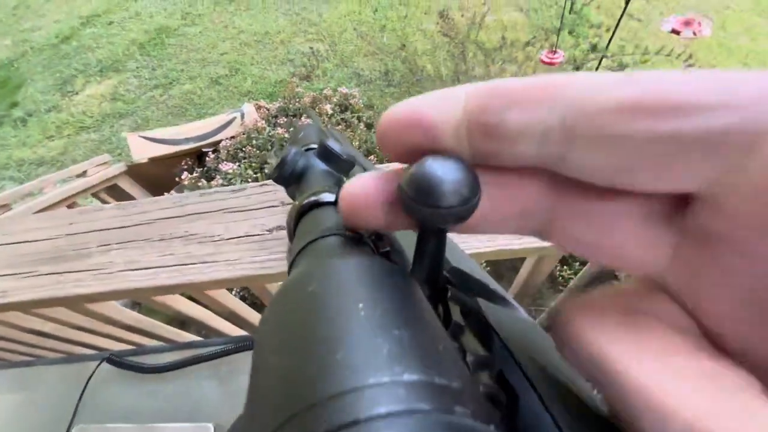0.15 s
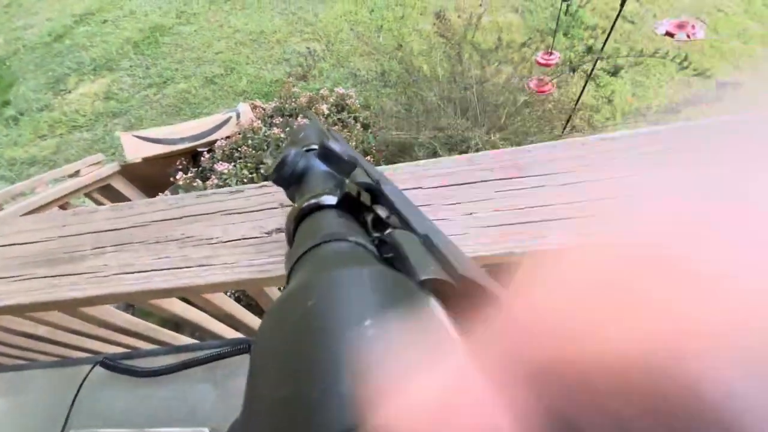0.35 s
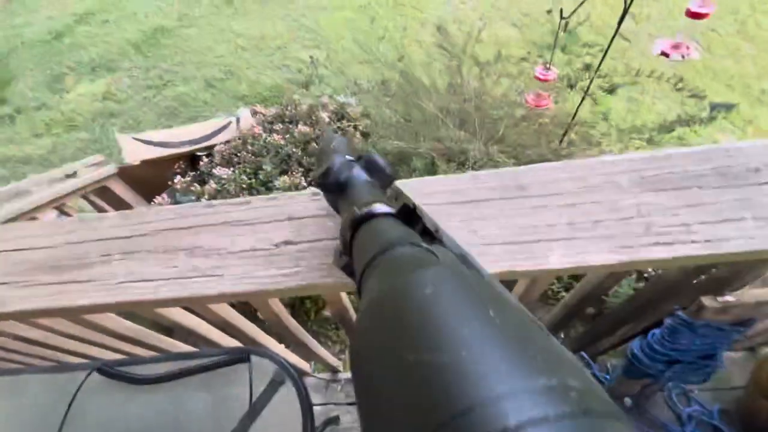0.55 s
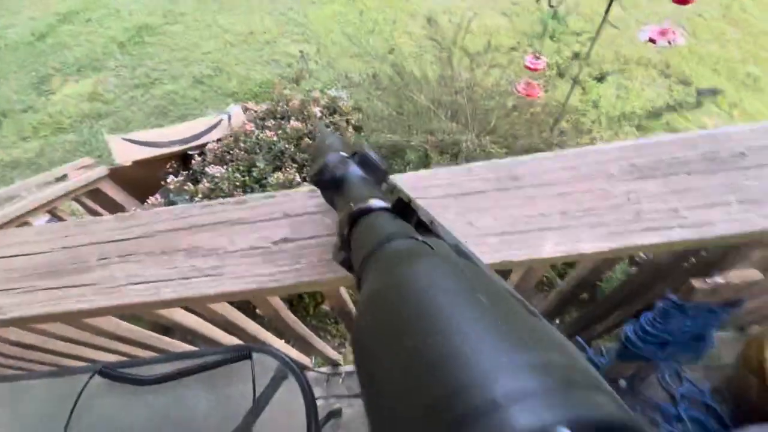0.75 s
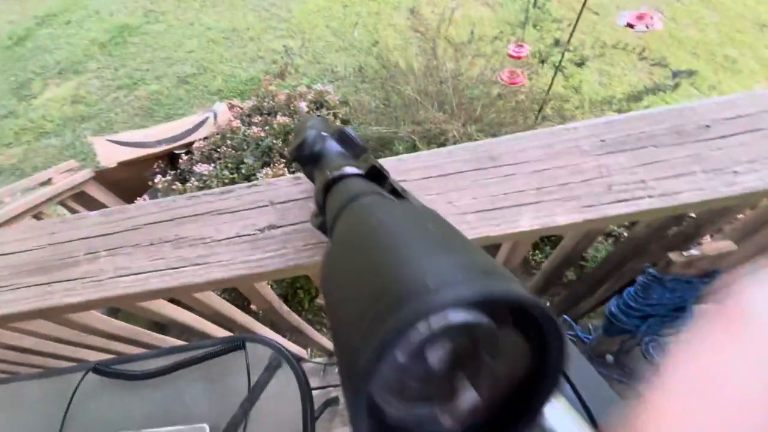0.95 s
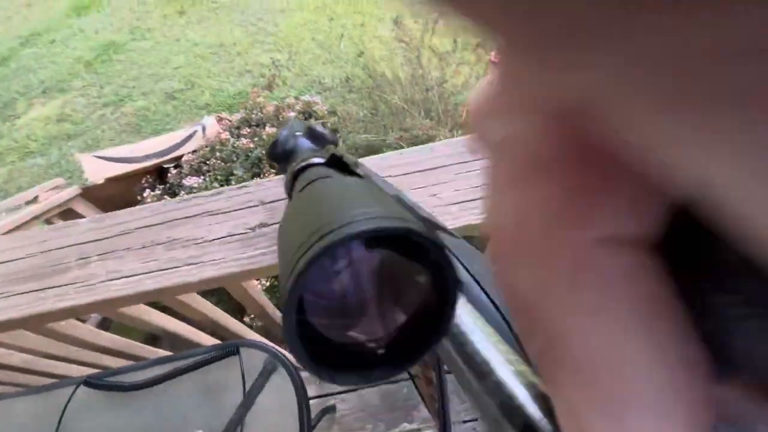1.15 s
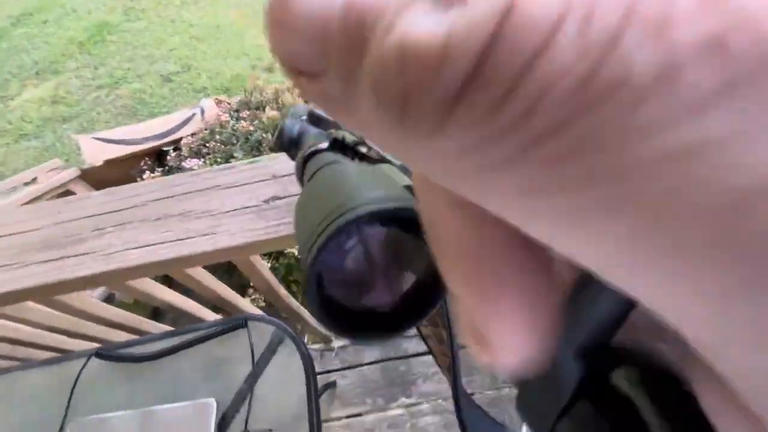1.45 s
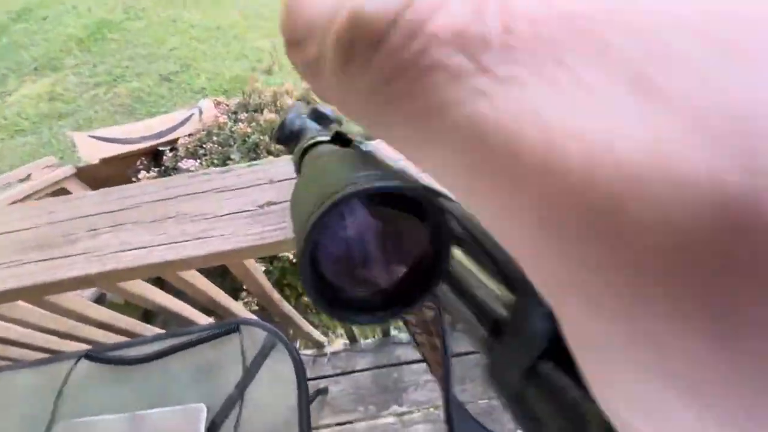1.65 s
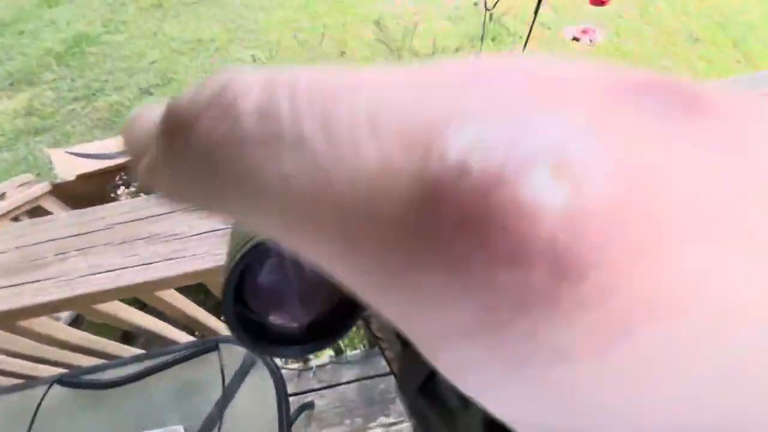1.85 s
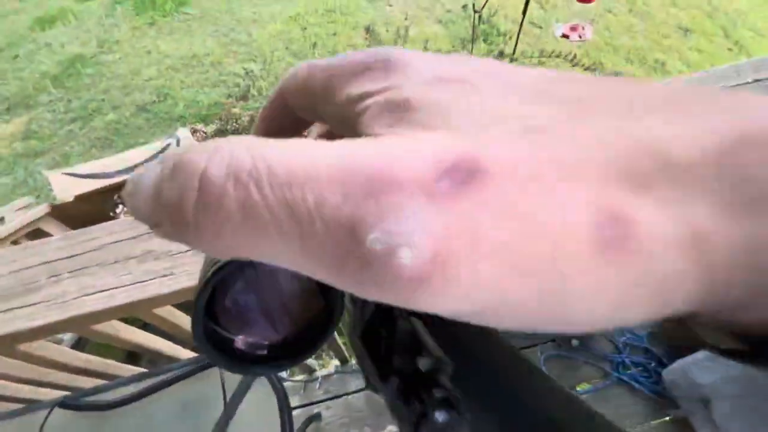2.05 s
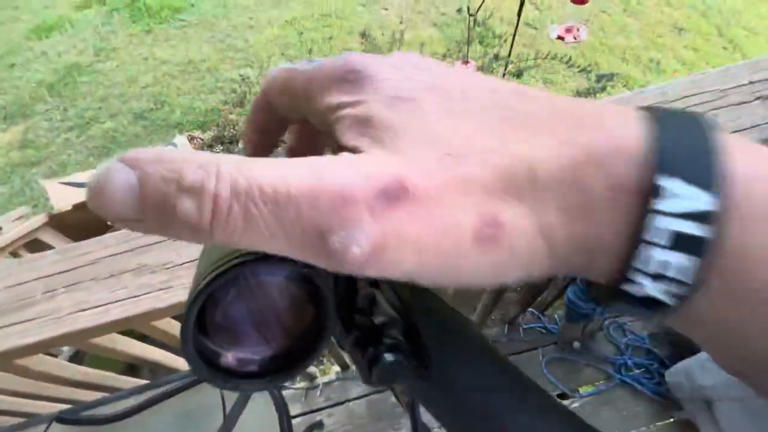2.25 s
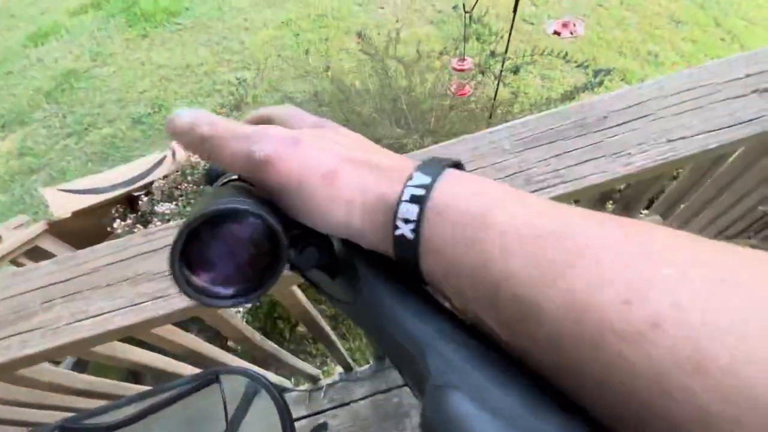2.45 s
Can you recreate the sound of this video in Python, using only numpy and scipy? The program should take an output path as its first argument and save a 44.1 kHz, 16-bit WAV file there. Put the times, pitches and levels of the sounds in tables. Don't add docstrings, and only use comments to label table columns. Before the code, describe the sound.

A rifle bolt is worked very close to the microphone on an outdoor porch: a quick run of clicks, a heavy hollow thud, faint hand fumbling, then a short scrape and a bright metal lock over a soft hum.

```python
import sys
import numpy as np
from scipy import signal
from scipy.fft import rfft, irfft
from scipy.io import wavfile
from scipy.ndimage import uniform_filter1d

SR = 44100
rng = np.random.default_rng(int(sys.argv[2]) if len(sys.argv) > 2 else 0)


def volts(x):
    e = np.asarray(x, float) / 20
    return 10 ** e


def to_wav(s):
    ch = np.atleast_2d(s).T
    pcm = np.round(np.clip(ch, -1, 1) * 32767)
    wavfile.write(sys.argv[1], SR, pcm.astype(np.int16))


N = 114660

# time_s, level_db
GARDEN_LEVEL = [(0,-56),(.12,-53),(.4,-47.5),(.5,-60),(.62,-49),(.9,-48.5),(1.1,-49),(1.2,-52.5),(1.65,-58.5),(1.8,-50.5),(2.2,-47),
                (2.34,-49),(2.44,-62),(2.52,-50),(2.6,-50.5)]
# frequency_hz, density_db (per Hz)
GARDEN_SPECTRUM = [(25,-32),(48,-9.5),(330,-8.5),(660,-25),(979,-15.5),(4730,-34.5),(12000,-47.5),(12900,-67.5)]
# frequency_hz, level_db
GARDEN_WIDTH = [(60,-7.5),(200,-3.5),(700,10.5),(1290,0),(2380,8),(4400,-8),(8120,0)]
# frequency_hz, level_db
COOLER_PARTIALS = [(119,-65),(241,-58),(355,-66.5),(953,-68)]
HUM_REF_DB = -53
TREBLE_FOLLOWS = 0.59

# time_s, level_db
RUB_LEVEL = [(0, -83), (.1, -69.5), (.2, -67), (.3, -48), (.35, -53.5), (.45, -80), (.98, -84),
             (1.05, -63.5), (1.21, -64.5), (1.27, -70), (1.44, -76), (1.46, -62), (1.52, -55.5),
             (1.63, -65.5), (1.95, -69), (2.12, -65.5), (2.22, -83), (2.285, -46.5), (2.36, -64.5),
             (2.44, -78.5)]
# frequency_hz, density_db (per Hz)
RUB_SPECTRUM = [(1500,-6),(3200,-10.5),(6500,-7),(12200,-9.5),(12700,-39.5),(13500,-39.5),(14200,-13),(16200,-18.5)]

# time_s, level_db
SLIDE_LEVEL = [(2.07,-66),(2.105,-49),(2.155,-51),(2.2,-50),(2.235,-64),(2.255,-45.5),(2.295,-40),(2.32,-77)]
# frequency_hz, level_db, t60_s
CHANNEL_MODES = [(1370,-18.5,0.023),(2300,-2.5,0.014),(2680,3,0.017),(3710,-8,0.013),(6500,-10.5,0.012)]

# start_s, pitch_hz, level_db, t60_s
STOCK_TAPS = [(.337,953,-27.5,0.053),(.3495,780,-23.5,0.038),(.354,323,-16,0.017),(.42,720,-39.5,0.083),(2.317,566,-17.5,0.015),(1.234,1413,-38.5,0.064),(1.235,2080,-39,0.031),(1.560,925,-41.5,0.048),(1.57,1050,-37,0.026),(1.580,2190,-42,0.044),(1.5888,976,-28,.024),
              (1.5888,2183,-28,.024),(2.006,908,-32.5,0.052),(2.0115,942,-32.5,.035),(2.052,1000,-25,0.017),(2.123,890,-40.5,0.033)]
TAP_RISE_S = 0.00081

# start_s, level_db, side_share, first_pitch_hz, t60_s
BODY_THUDS = [
    (0.245,-32,0.42,205,0.22),
    (0.357,-1,0.83,202,0.11),
    (2.054,-27.5,0.17,300,0.074),
    (2.3146,-11.5,0.21,407,0.052),
]
THUD_END_HZ, THUD_SAG_S, THUD_RISE_S = 72, 0.0065, 0.002
BONK_S, BONK_DB, BONK_SIDE_DB = 0.3515, -5, 3
BONK_HZ, BONK_SAG_HZ_PER_S, BONK_LEAD_RAD = 1050, 22000, 0.22
BONK_T60_S, BONK_RISE_S = 0.026, 0.002

# start_s, stock_db, steel_db, contact_ms, favoured_hz
LIFT_CLICKS = [(0.055,-29.5,-31.5,3,1900),(0.23,-37,-26,1.1,8500),(.237,-21,-38,3.8,1726),(0.239,-20,-19,4.5,6500),(0.2434,-10.5,-15,2.75,987),(.248,-18,-5,2.53,7250),
               (0.2508,-12.5,-18,1.47,880),(0.2519,-22.5,-18,1.9,7600),(.258,-31,-25,4.6,2200),(0.268,-15,-14.5,2,6260),(0.2722,-24,-21,2.4,6200),(.277,-22.5,-30,3.1,1500),(0.286,-26,-19,6,3520),(.293,-27.5,-40,3,1270)]
PULL_CLICKS = [(0.352,-13.5,-21,0.37,1400),(.367,-18.5,-6,2,4300),(0.3686,-30,-9,2.7,8000),(0.3721,-13.5,-5,2.005,1050),(.377,-25,-10.5,2.2,2000),(0.384,-14,-9.5,1.45,4250),
               (.388,-16,-27,2.7,1000),(0.3927,-13.5,-35.5,1.5,920),(0.3961,-14,0,2.8,6500),(.3988,-12.5,1,1.35,3010),(0.4006,-10,-4.5,1.3,1900),(0.4022,-13.5,-25,1.2,1480),
               (.4045,-26,-19,1.8,2690),(0.4072,-24,-17,0.98,4500),(0.4105,-25.5,-11.5,1.78,10600),(0.416,-26,-38,3,1000)]
FUMBLE_CLICKS = [(1.081,-39,-52,3.7,2390),(1.147,-23,-52,5.95,2300),(1.158,-32.5,-57,4.6,2610),(1.233,-21.5,-20.5,2.7,4960),(1.412,-39,-64,4,1900),(1.448,-41,-58,4.2,1230),
                 (1.5585,-34.5,-35,3,4200),(1.5795,-59,-21.5,2,7240),(1.5885,-23.5,-43,1.98,1800),
                 (1.921,-28,-45,7.2,2300),(1.972,-36,-48,2,850),(2.006,-30,-58,3.07,970),(2.0091,-23,-32,3.6,2720),(2.047,-55,-23,1.5,5130),
                 (2.0531,-37,-75,2.9,850),(2.167,-30.5,-57,6.4,1500),(2.394,-38.5,-76,3,1020)]
LOCK_CLICKS = [(2.2795,-21,-23,2.4,6300),(2.298,-10,-5,2.19,3350),(2.3021,-12,-9,0.97,2610),(2.305,-15,-6,3.4,3020),(2.308,-12.5,-5.5,2.23,3030),(2.3088,-36,3,5,9050),
               (2.312,-12.5,-3,1.93,2260),(2.3153,-12,-5,2,3400),(2.3162,-16,-3.5,2.68,6600),(2.320,-15,-23,2.9,2400),(2.328,-33,-39,4,3200)]
GESTURE_PANS = 2, 0, 2.5, 5.5
# frequency_hz, level_db, t60_s
STOCK_MODES = [(462,-3.5,0.024),(723,-37.5,0.034),(850,-37,0.074),(982,1,0.025),(1157,-8.5,0.039),(1467,-1,0.027),(1800,-3.5,0.03),(2000,-6,0.037),(2265,2,0.014),(2555,-6,0.017)]
# frequency_hz, level_db, t60_s
STEEL_MODES = [(2910,-5,0.013),(3350,-0.5,0.01),(3986,2.5,0.014),(4500,0,0.0071),(5100,3,0.0074),(6100,4.5,0.0093),(6710,3.5,0.014),(7850,1.5,.008),(8500,-5.5,0.013),
               (9050,6,0.01),(10600,6,0.0045),(11380,3,0.0046),(12800,-4,.004),(13800,-1.5,0.0063)]
FAVOUR_DB, FAVOUR_OCTAVES = 13, 0.3
SCATTER_DB, DETUNE, LAG_S = 1.5, 0.012, 0.00013
CRACK_DB, KNOCK_LOW_HZ = -9, 500
TAIL_DB, TAIL_T60_S, TAIL_HZ = -17, 0.065, 3730

# frequency_hz, width_hz, level_db
HOUSING_DIPS = [(5530,170,-8),(7330,167,-30),(9350,185,-17),(13150,350,-2)]
TOP_HZ = 16300

SIDE = np.array([[1], [-1]])


def read(table, hz):
    f, v = np.array(table, float).T
    return np.interp(np.log(hz), np.log(np.maximum(f, 1)), v)


def curve(table):
    return np.interp(np.arange(N) / SR, *np.array(table, float).T)


def fade(t, t60):
    return np.exp(-np.log(1000) * t / np.maximum(t60, 1e-3))


def walk(rate):
    k = int(SR / rate)
    steps = np.repeat(rng.standard_normal(N // k + 1), k)
    return 1.18 * uniform_filter1d(uniform_filter1d(steps, k), k)[:N]


def bands(spectrum):
    f = np.arange(1, N // 2 + 2) * SR / N
    for hz in 30 * 2 ** np.arange(0, 9.4, 0.5):
        window = np.cos(np.pi * np.clip(np.log2(f / hz), -0.5, 0.5))
        noise = rfft(rng.standard_normal((2, N)))
        yield hz, irfft(noise * window * volts(read(spectrum, f)), N)


def add(out, s, x):
    i = int(s * SR)
    out[:, i:i + x.shape[1]] += x[:, :N - i]


def ring(modes, t, favoured_hz):
    hz, db, t60 = np.array(modes, float).T[:, :, None]
    tuning, strength, lag = rng.standard_normal((len(modes), 3)).T[:, :, None]
    w = 2 * np.pi * hz * (1 + DETUNE * tuning)
    favour_db = FAVOUR_DB * np.exp(-(np.log2(hz / favoured_hz) / FAVOUR_OCTAVES) ** 2)
    envelope = volts(db + favour_db + SCATTER_DB * strength) * fade(t, t60)
    y = np.array([(envelope * np.sin(w * (t + port * LAG_S * lag))).sum(0) for port in (0, 1)])
    return y / np.abs(y).max()


def garden():
    db, t = curve(GARDEN_LEVEL), np.arange(N) / SR
    wash, still_bass = 0, 0
    for hz, pair in bands(GARDEN_SPECTRUM):
        share = 1 if hz < 600 else TREBLE_FOLLOWS
        still_bass = still_bass + pair[0] * (hz < 600)
        pair = pair * volts(share * (db - HUM_REF_DB) + 1.7 * walk(9.97))
        wash = wash + pair[0] + volts(read(GARDEN_WIDTH, hz)) * pair[1] * SIDE
    hum = 0
    for hz, level_db in COOLER_PARTIALS:
        strength = volts(level_db + 3.2 * walk(5.89))
        phase = 2 * np.pi * hz * t + 0.74 * walk(4.6) + np.array([[0], [1.5]])
        hum = hum + strength * np.sin(phase)
    return wash / still_bass.std() * volts(-57.5) + 1.22 * hum * volts(db - HUM_REF_DB)


def rub():
    hiss = sum(pair * volts(3.7 * walk(23.84)) for hz, pair in bands(RUB_SPECTRUM))
    hiss = hiss / hiss[0].std() * volts(curve(RUB_LEVEL) + 5.1 * walk(40.62))
    return hiss[0] + hiss[1] * SIDE


def slide():
    grit = rng.standard_normal(N) ** 3 * volts(curve(SLIDE_LEVEL) + 1.5 * walk(60))
    t, seating = np.arange(1024) / SR, np.arange(N) / SR > 2.165
    channel = volts(-1.0) * ring(CHANNEL_MODES, t, 9000)
    seat = ring(STOCK_MODES, t, 1740) + 0.16 * ring(STEEL_MODES, t, 3400)
    out = np.zeros((2, N))
    for part, body in ((~seating, channel), (seating, seat)):
        out += signal.fftconvolve((grit * part)[None], body, axes=1)[:, :N]
    return out * volts(-22.0)


def taps():
    out, t = np.zeros((2, N)), np.arange(4096) / SR
    for s, hz, db, t60 in STOCK_TAPS:
        envelope = volts(db) * fade(t, t60) * (1 - np.exp(-(t / TAP_RISE_S) ** 2))
        add(out, s, envelope * np.sin(2 * np.pi * hz * t + 0.5 * SIDE) * volts(1.5 * SIDE))
    return out


def thuds():
    out, t = np.zeros((2, N)), np.arange(8192) / SR
    for s, db, side, hz, t60 in BODY_THUDS:
        sag = (hz - THUD_END_HZ) * THUD_SAG_S * (1 - np.exp(-t / THUD_SAG_S))
        turns = THUD_END_HZ * t + sag
        y = -np.sin(2 * np.pi * turns) * fade(t, t60) * (1 - np.exp(-t / THUD_RISE_S))
        add(out, s, volts(db) * y * (1 - side - side * SIDE))
    envelope = volts(BONK_DB) * fade(t, BONK_T60_S) * (1 - np.exp(-(t / BONK_RISE_S) ** 4))
    phase = 2 * np.pi * (BONK_HZ - BONK_SAG_HZ_PER_S * t) * t
    apart = -volts(BONK_SIDE_DB) * SIDE * np.sin(phase + BONK_LEAD_RAD)
    add(out, BONK_S, envelope * (np.sin(phase) + apart))
    return out


def contact_grit(ms):
    u = np.arange(1024) / SR / (max(ms, 0.2) / 1000)
    swell = u ** 2 * np.exp(-3.5 * u)
    grit = rng.standard_normal((3, 1024)) * swell
    grit[0] = np.maximum(np.abs(grit[0]) - 1.46 * swell, 0) ** 2 * np.sign(grit[1])
    grit *= 0.84 / np.sqrt(np.sum(grit ** 2, axis=1))[:, None]
    grit[:, np.argmax(swell)] += 0.55
    return grit


def clicks():
    out, t = np.zeros((2, N)), np.arange(4096) / SR
    porch = signal.butter(2, [750, TAIL_HZ], "band", fs=SR)
    gestures = LIFT_CLICKS, PULL_CLICKS, FUMBLE_CLICKS, LOCK_CLICKS
    for rows, pan_db in zip(gestures, GESTURE_PANS):
        for s, stock_db, steel_db, ms, hz in rows:
            grit = contact_grit(ms)
            steel = ring(STEEL_MODES, t, hz)
            steel[:, :3] += volts(CRACK_DB) * np.array([[0.5, 0.0, -0.6], [-1.7, -2.0, 2.0]])
            tail = signal.lfilter(*porch, rng.standard_normal((2, 4096)))
            tail = tail * fade(t, TAIL_T60_S) * (1 - fade(t, 0.0022))
            wood = volts(stock_db) * ring(STOCK_MODES, t, hz)
            wood = wood + volts(TAIL_DB) * (volts(stock_db) + volts(steel_db)) * tail
            y = signal.fftconvolve(wood, grit[:1], axes=1)
            y = y + volts(steel_db) * signal.fftconvolve(steel, grit[2:], axes=1)
            add(out, s, y * volts(pan_db * SIDE / 2))
    return signal.lfilter(*signal.butter(2, KNOCK_LOW_HZ, "high", fs=SR), out)


def scene():
    return garden() + rub() + slide() + taps() + thuds() + clicks()


def low_pass(x):
    return signal.sosfilt(signal.butter(12, 16670, fs=SR, output="sos"), x)


def record(dry):
    f = np.arange(N // 2 + 1) * SR / N
    db = -70 * np.clip((f - TOP_HZ) / 500, 0, 1)
    for hz, width, depth in HOUSING_DIPS:
        db = db + depth * np.exp(-((f - hz) / width) ** 2)
    limited = np.tanh(0.79 * dry) / 0.6
    mix = irfft(rfft(limited) * volts(db), N)
    return low_pass(mix)


dry = scene()
out = record(dry)
to_wav(out)
```